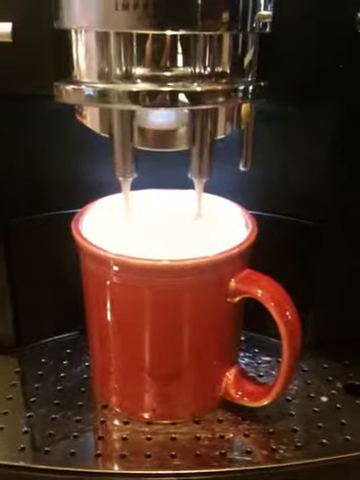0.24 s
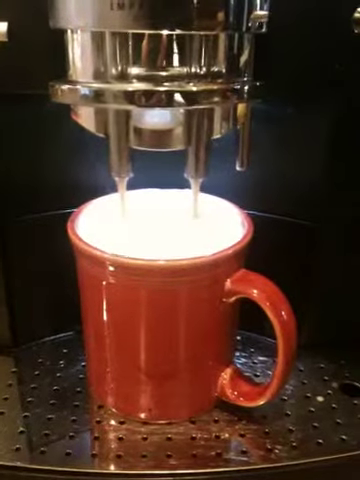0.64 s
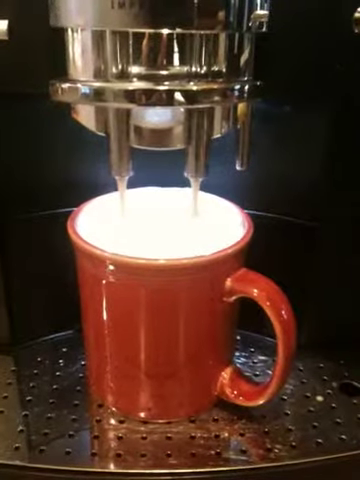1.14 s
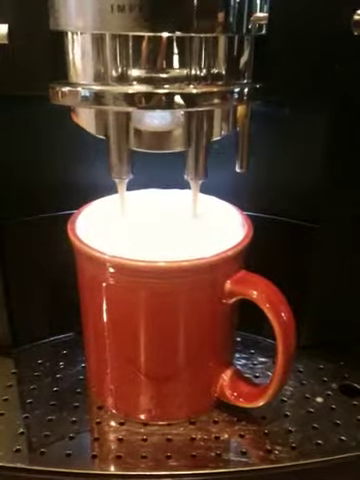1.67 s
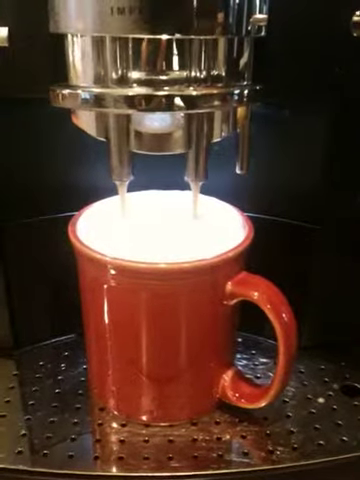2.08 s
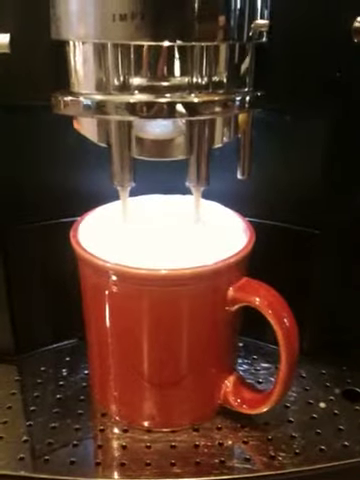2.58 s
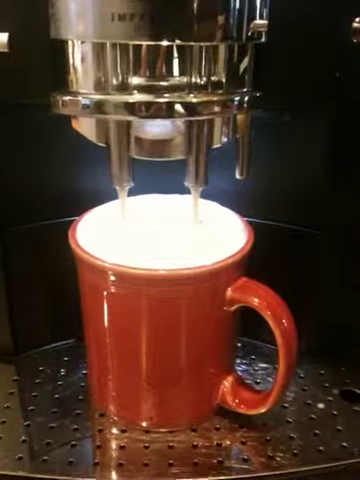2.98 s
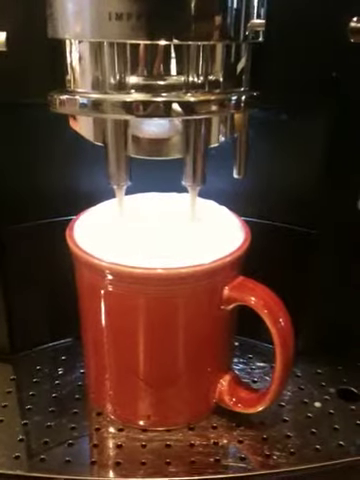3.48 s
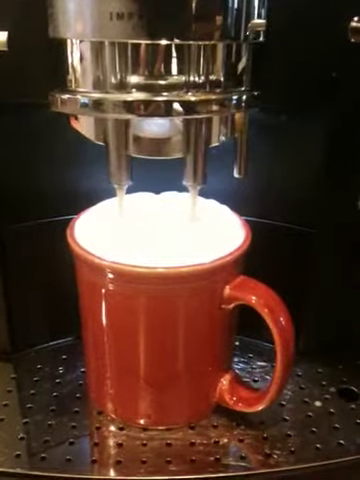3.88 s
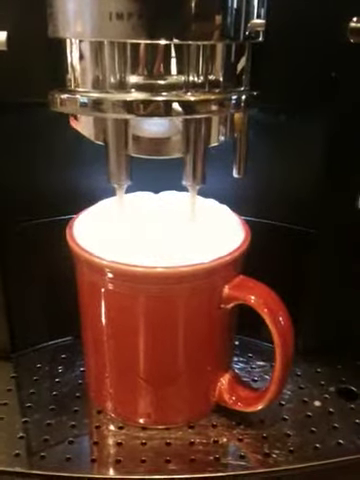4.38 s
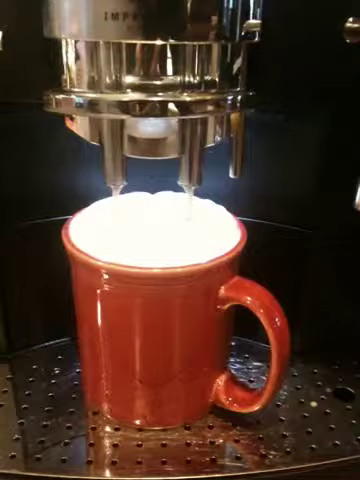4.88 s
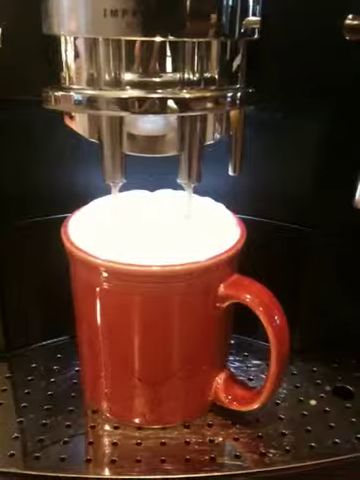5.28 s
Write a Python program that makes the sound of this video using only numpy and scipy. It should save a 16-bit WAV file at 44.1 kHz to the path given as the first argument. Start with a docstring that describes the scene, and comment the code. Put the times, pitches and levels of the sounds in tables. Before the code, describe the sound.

Close to a coffee machine in a still home kitchen, the pump hums and buzzes evenly at a low level for about four seconds. It cuts off with a small vent of air and light ticks. A second later comes one sharp plastic clack, by far the loudest sound, followed by a smaller double knock as a geared motor starts.

```python
"""Coffee machine finishing a mug

Close up in a quiet kitchen. The vibrating pump hums at the mains rate and its valve rasps once a stroke
while coffee trickles into foam. The pump stops and vents, a latch clacks loudly, and half a second later
the brew unit's drive knocks into motion."""
import sys
import numpy as np
from scipy import signal
from scipy.fft import rfft, irfft
from scipy.io import wavfile

SR = 44100
rng = np.random.default_rng(int(sys.argv[2]) if len(sys.argv) > 2 else 0)


def wrap_up_sound(samples):
    """Save the sound to the file named by the first command line argument, as 16-bit audio."""
    columns = np.atleast_2d(samples).T
    # keep every value between -1 and 1, then stretch to whole-number steps
    tamed = np.clip(columns, -1, 1)
    steps = np.round(tamed * 32767).astype(np.int16)
    wavfile.write(sys.argv[1], SR, steps)


N = 244298
T = np.arange(N) / SR
FREQ = np.maximum(np.arange(N // 2 + 1) * SR / N, 1)
MAINS_HZ, PUMP_OFF_S = 60.0, 3.944

# blows of valve, latch and gears: t/s, level/dB, brightness/(dB per octave), lead of the first touch/s
BLOWS = [(4.005, -53.5, -1.5, 0.0026), (4.095, -63, 1.5, 0.0032), (4.207, -59, 0, .001),
         (4.9366, -17.5, 4.5, .0034), (5.210, -55, -1.5, .003), (5.4366, -33, 1, .0075),
         (5.500, -39.5, -8.5, .014)]


def amp(db):
    """Decibels to gain."""
    return 10 ** (np.asarray(db) / 20)


def unit(x):
    """Scale to rms 1."""
    return x / np.sqrt(np.mean(x ** 2))


def at_hz(table, hz, column=1):
    """Read a column of a table on a log-frequency axis."""
    table = np.array(table, float)
    return np.interp(np.log(hz), np.log(table[:, 0]), table[:, column])


def lift_db(resonances, f):
    """Boost or cut that a set of flat-topped resonances gives at frequency f."""
    return sum(db / (1 + ((f - hz) / width * 2) ** 4) for hz, width, db in resonances)


def noise(gain):
    """Noise of rms 1 with the given gain at each frequency."""
    return unit(irfft(rfft(rng.standard_normal(N)) * gain, N))


def wander(rate_hz):
    """Random curve of spread near 1 that turns rate_hz times a second."""
    knots = rng.standard_normal(int(N / SR * rate_hz) + 2)
    return np.interp(T * rate_hz, np.arange(len(knots)), knots)


def burst(db_at, t60_at, size):
    """Dense ringing: half-octave bands of noise, each with its own strength and decay."""
    t, f = T[:size], np.maximum(np.arange(size // 2 + 1) * SR / size, 1)
    spectrum = np.exp(2j * np.pi * rng.random(len(f))) * amp(db_at(f))
    out = 0
    for hz in 1000 * 2 ** (np.arange(-9, 10) / 2):
        share = np.maximum(1 - 2 * abs(np.log2(f / hz)), 0)
        out = out + irfft(spectrum * share, size) * amp(-60 * t / t60_at(hz))
    return out / np.std(irfft(spectrum, size))


def room_tone(hiss_db=-68.5):
    """Soft hiss of the still kitchen, with the narrow drones of the idling machine and the thin whine of a
    lamp's power supply."""
    # colour of the hiss: f/Hz, level/dB
    hiss_colour = [(15, -74), (25, -39), (64, -34), (141, -8), (170, -14.5), (200, -3), (229, -8),
                   (427, -18), (607, -11.5), (1330, -18.5), (1740, -20), (2000, -22), (4140, -25),
                   (4740, -27), (7310, -29), (14800, -32), (16000, -49)]
    # idling drones: f/Hz, width/Hz, level/dB
    drone_bands = [(203, 7.7, -75.5), (1780, 56, -88), (3200, 77, -88), (4570, 140, -93), (6950, 140, -91),
                   (10200, 2200, -94)]
    # electrical whine, split into lines by the mains: f/Hz, level/dB
    whine_lines = [(14910, -98), (14970, -87.5), (15030, -87), (15090, -94), (15150, -98)]
    drones = sum(amp(db) * noise(1 / (1 + ((FREQ - hz) / width * 2) ** 2))
                 for hz, width, db in drone_bands)
    whine = sum(amp(db) * np.sqrt(2) * np.sin(2 * np.pi * (hz * T + rng.random()))
                for hz, db in whine_lines)
    hiss = amp(hiss_db + 0.089 * wander(7.1)) * noise(amp(at_hz(hiss_colour, FREQ)))
    return hiss + drones + whine


def kitchen_echo(x, wet_db=-15.5, build_s=0.0051):
    """Diffuse echo of a small hard room, well below the direct sound at this distance."""
    # the room's reverberation: f/Hz, level/dB, t60/s
    reverb = [(97, -3, 0.37), (310, -1, 0.65), (705, -5, 0.46), (1580, 2.5, 0.58), (3030, -1.5, 0.46),
              (4200, 1.5, 0.32), (5540, 0, 0.41), (8050, -3, 0.25), (15000, -9, 0.37)]
    tail = burst(lambda f: at_hz(reverb, f), lambda f: at_hz(reverb, f, column=2), size=32768)
    tail *= 1 - np.exp(-T[:len(tail)] / build_s)
    return amp(wet_db) * signal.fftconvolve(x, tail / np.linalg.norm(tail))[:N]


def trickle(bubbles=400, low_hz=700, high_hz=5000, level_db=-80, thinning_db=-12):
    """Coffee lands in foam: tiny bubbles ring and rise in pitch, fainter once the pump is off."""
    out, t = np.zeros(N + 2048), T[:2048]
    for when, pitch, strength in rng.random((bubbles, 3)):
        hz, start = low_hz * (high_hz / low_hz) ** pitch, int(when * N)
        age = t * hz / 6  # in spans of six cycles
        rise = 1 + 0.048 * np.minimum(age, 2)
        out[start:start + len(t)] += strength ** 2 * np.exp(-2 * age) * np.sin(2 * np.pi * hz * t * rise)
    thinned = np.clip((T - PUMP_OFF_S) / 0.25, 0, 1)
    return unit(out[:N]) * amp(level_db + thinning_db * thinned)


def vent(peak_s=4.008, rise_s=0.03, fall_s=0.033, level_db=-53.5):
    """The line's pressure bleeds off through the valve in a short, soft swell of hiss."""
    # colour of the venting hiss: f/Hz, level/dB
    colour = [(80, -35), (230, 4.5), (550, -6), (1100, -8.5), (3000, -14.5), (4500, -23), (16000, -36)]
    swell = np.exp(-np.maximum((peak_s - T) / rise_s, (T - peak_s) / fall_s))
    return amp(level_db) * swell * noise(amp(at_hz(colour, FREQ)))


def drive(start_s=5.438, attack_s=0.008, level_db=-44.5, ease_db_per_s=-55, tooth_hz=130, grind_db=4):
    """The brew unit's geared motor starts with a jolt, then eases, grinding unevenly."""
    # colour of the gear noise: f/Hz, level/dB
    colour = [(35, -66), (70, -50), (118, -18), (417, -7), (651, -12), (732, -21), (1170, -20), (1380, -24),
              (13900, -60), (16000, -60)]
    age = np.maximum(T - start_s, 0)
    effort = (1 - np.exp(-age / attack_s)) * amp(level_db + ease_db_per_s * age)
    return noise(amp(at_hz(colour, FREQ))) * effort * amp(grind_db * wander(tooth_hz))


def contacts(chatter_gap_s=0.0033, rebound_s=0.042):
    """Each part touches, strikes and bounces; yields t/s, level/dB, brightness/(dB per octave)."""
    for s, db, brightness, lead_s in BLOWS:
        yield s - lead_s, db - 7.5, brightness - 0.5  # light first touch
        for k in range(5):  # the blow and its chatter, fading and dulling as the part seats
            yield s + k * chatter_gap_s, db - 1.0341 * k ** 2, brightness - 1.9 * k
        yield s + rebound_s, db - 15.5, brightness - 6


def knocks(attack_s=0.00075, ring_db=-16, ring_build_s=0.0025, tilt_from_hz=450):
    """Each contact shakes the plastic housing in a short crack; with each blow its modes ring on."""
    # colour of a crack: f/Hz, level/dB
    crack_colour = [(30, -14), (85, -28), (150, 0), (220, -5.5), (320, 0), (430, -7.5), (570, 1.5),
                    (1000, -6.5), (2000, -8.5), (2500, -9.5), (3050, -8), (4200, -19.5), (5600, -14.5),
                    (7000, -18.5), (9200, -13), (10800, -20), (16000, -19.5)]
    # how fast a crack dies: f/Hz, t60/s
    crack_decay = [(150, 0.069), (600, 0.07), (2000, 0.036), (6000, 0.032), (14000, 0.0075)]
    # modes of the housing: f/Hz, level/dB, t60/s
    modes = [(149.4, -5, 0.16), (241.7, -5, 0.22), (339.6, -2, 0.18), (520, 1, 0.11), (591, 4, 0.15),
             (678, -1, 0.23), (785, -10, 0.23), (856, -12, 0.21), (1125, -5, 0.058), (1400, -9, 0.092),
             (1660, -28, 0.19), (2130, -17, 0.2), (2990, -10, 0.16), (3150, -29, 0.21), (5529, -28, .13),
             (9050, -26, 0.091)]
    out, t = np.zeros(2 * N), T[:16384]
    for s, db, brightness in contacts():
        crack = burst(
            lambda f: at_hz(crack_colour, f) + brightness * np.log2(np.maximum(f / tilt_from_hz, 1)),
            lambda f: at_hz(crack_decay, f), size=len(t))
        start = int(s * SR)
        out[start:start + len(t)] += amp(db) * (1 - np.exp(-t / attack_s)) * crack
    ring = sum(amp(db - 60 * t / t60) * np.sin(2 * np.pi * hz * t) for hz, db, t60 in modes)
    ring *= 1 - np.exp(-t / ring_build_s)
    for s, db, _, _ in BLOWS:
        start = int(s * SR)
        out[start:start + len(t)] += amp(db + ring_db) * ring
    return out[:N]


def panel_lag(k, push_turns=0.13, resonance_hz=270, bending_hz=360):
    """Lag in turns of the piston's overtone k on its way through the panels."""
    flip = 0.5 * (k * MAINS_HZ < resonance_hz)  # the main panel's swing turns round at resonance
    bending = 0.2 * max(k - bending_hz / MAINS_HZ, 0) ** 2  # bending waves set in higher up
    return k * push_turns + flip + bending


def valve_rasp(strokes, closing_turn=0.34, fade_turns=0.15, uneven_db=2.9):
    """A steady rush that flares as the valve starts to close, then fades back over the stroke."""
    # colour of the rasp: f/Hz, level/dB
    colour = [(50, -16), (100, -4), (200, 1), (380, 0), (600, -.5), (950, -5.5), (1300, -8.5), (1800, -9),
              (2400, -9), (3400, -5), (4300, -12.5), (7000, -12), (9800, -15), (12000, -23), (16000, -29)]
    # resonances of the valve and its pipework: f/Hz, width/Hz, lift/dB
    pipework = [(1155, 23, 17), (1480, 110, 10.5), (1930, 580, 7), (2910, 730, 7), (5430, 200, -2),
                (5560, 190, 1), (6740, 330, 3.5), (8500, 240, 3)]
    age = (strokes - closing_turn) % 1 / fade_turns
    flare = age * np.exp(1 - age) * amp(-uneven_db * wander(87))
    rush = noise(amp(at_hz(colour, FREQ) + lift_db(pipework, FREQ)))
    return unit((1 + flare) * rush)


def pump(hum_db=-50, buzz_db=-63, rasp_db=-63, valve_rise_db_per_s=0.5, waver_db=2.9,
         shut_turn=0.56, smear_turns=0.1728, rundown_s=0.011, linger_db=-15, linger_s=0.22):
    """The piston's push hums through the panels; about half a stroke later the valve buzzes shut."""
    # low overtones that the panels radiate: multiple of the stroke rate, level/dB
    hum_overtones = [(1, -44), (2, -9), (3, -3.5), (4, 1), (5, -3), (6, -9), (7, -12.5), (8, -10.5),
                     (9, -3.5), (10, -7.5), (11, -17.5), (12, -14.5), (13, -12), (14, -26.5), (15, -16),
                     (16, -20.5), (17, -22.5), (18, -14), (19, -20)]
    # overtones that swell or fade as the mug fills: multiple of the stroke rate, slope/(dB per s)
    overtone_drift = [(8, -0.6), (9, 1.0), (13, -1), (15, 1), (18, -1.2), (19, 2.5), (22, 1), (34, 0)]
    # resonances that pick out the valve's buzz: f/Hz, width/Hz, lift/dB
    buzz_resonances = [(1256, 67, -1.5), (1351, 64, 4.5), (1590, 80, 7.5), (1745, 81, -4), (2031, 39, 9.5),
                       (2130, 62, 7.5), (2960, 180, 11), (3420, 300, 2.5), (4580, 890, -6.5)]
    strokes = MAINS_HZ * T + 0.0003 * wander(40)
    from_mid_pour_s = np.minimum(T, PUMP_OFF_S) - PUMP_OFF_S / 2
    slopes = {round(k): slope for k, slope in overtone_drift}
    # each pitch of the buzz takes its own path, so the shut is smeared, most below 2 kHz
    multiples = np.arange(1, 111)
    smear = smear_turns * np.maximum(2000 / (MAINS_HZ * multiples), 1)
    valve_lag = np.cumsum(shut_turn + smear * rng.standard_normal(len(multiples)))

    def overtone(k, db, lag):
        """One multiple of the stroke rate; it wavers more with pitch, up to 1300 Hz."""
        waver = min(k * MAINS_HZ / 1300, 1) * waver_db * wander(1.85)
        level = amp(db + slopes.get(k, 0) * from_mid_pour_s + waver)
        return level * np.sin(2 * np.pi * (k * strokes - lag))

    hum = unit(sum(overtone(k, db, panel_lag(k)) for k, (_, db) in enumerate(hum_overtones, 1)))
    # the buzz takes over above the hum and falls 8 dB an octave
    buzz = unit(sum(overtone(k, lift_db(buzz_resonances, k * MAINS_HZ) - 8 * np.log2(k), valve_lag[k])
                    for k in range(len(hum_overtones) + 1, len(multiples))))
    valve = amp(buzz_db) * buzz + amp(rasp_db) * valve_rasp(strokes)
    valve *= amp(valve_rise_db_per_s * from_mid_pour_s)  # louder as the pressure builds
    # the piston halts at once; its sound lingers briefly in the room
    since_off = np.maximum(T - PUMP_OFF_S, 0)
    running = np.maximum(np.exp(-since_off / rundown_s), amp(linger_db) * np.exp(-since_off / linger_s))
    return running * (amp(hum_db) * hum + valve)


def scene():
    """Pump, coffee and mechanism in the kitchen, at one microphone close to the machine."""
    panel_low_cut = signal.butter(2, 110, "high", fs=SR, output="sos")  # small panels give no deep bass
    mechanism = signal.sosfilt(panel_low_cut, knocks() + drive() + vent())
    return (pump() + trickle() + mechanism + kitchen_echo(mechanism) + room_tone())[None]


def record(dry):
    """The microphone's treble ends steeply at 15.8 kHz."""
    return signal.sosfilt(signal.ellip(10, 0.2, 70, 15800, fs=SR, output="sos"), dry)


dry = scene()
out = record(dry)
wrap_up_sound(out)
```